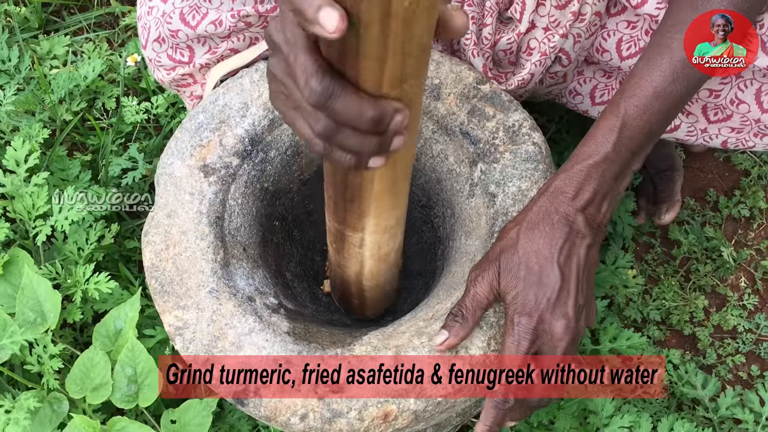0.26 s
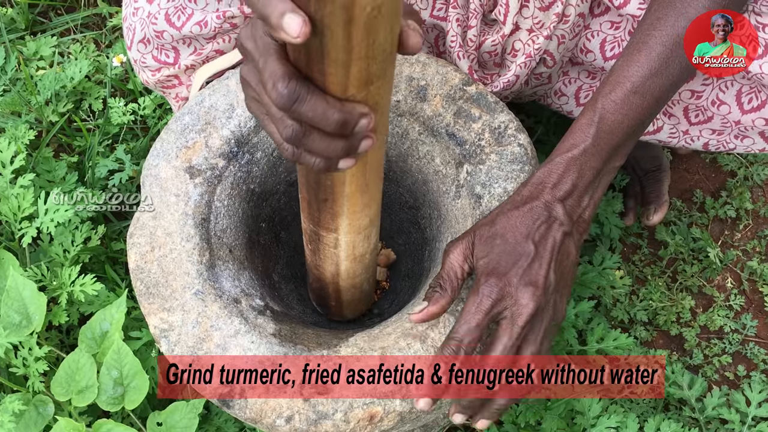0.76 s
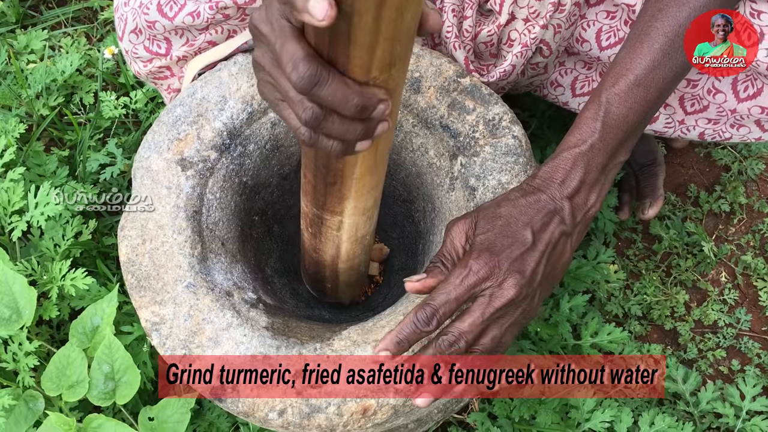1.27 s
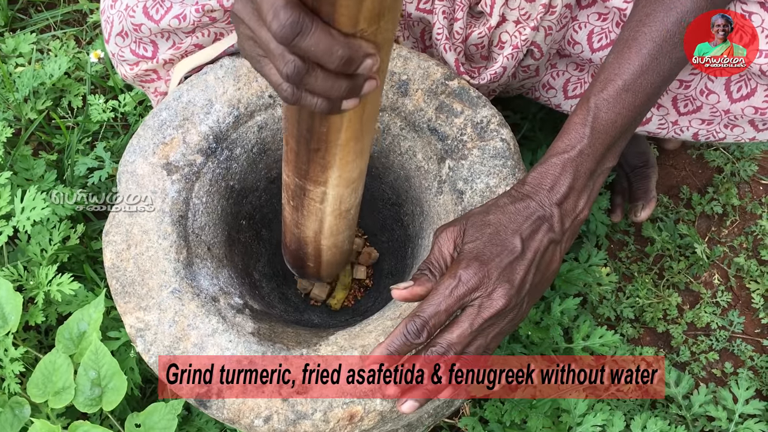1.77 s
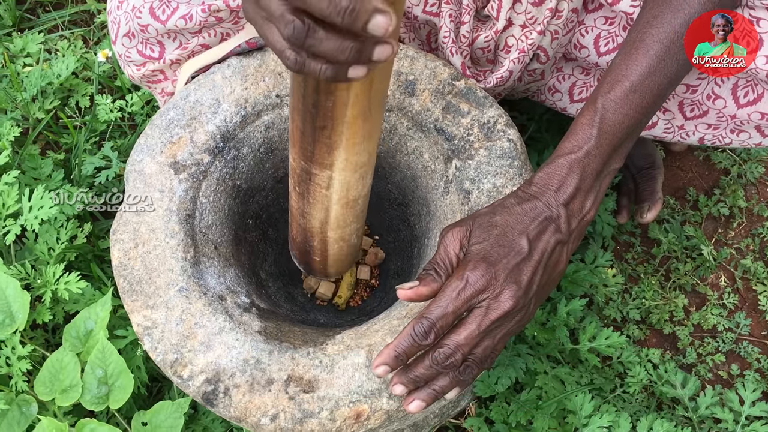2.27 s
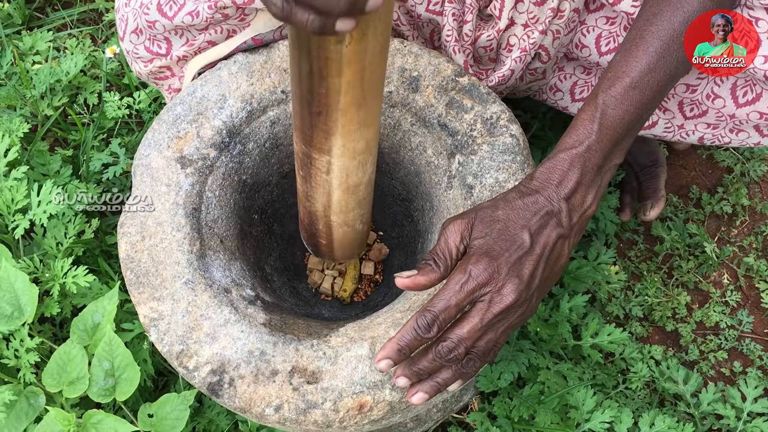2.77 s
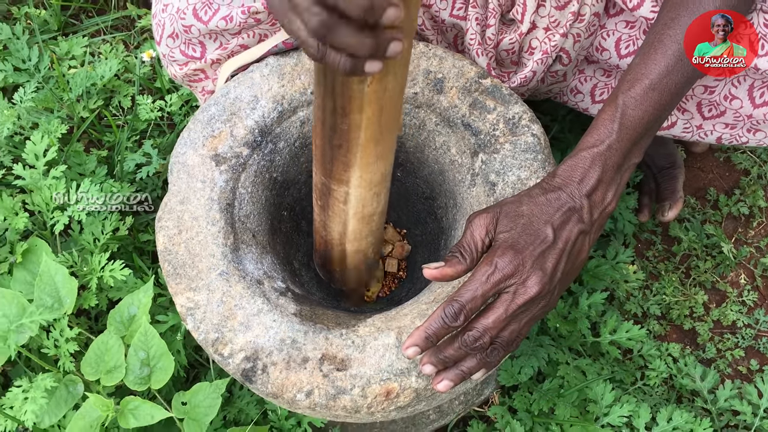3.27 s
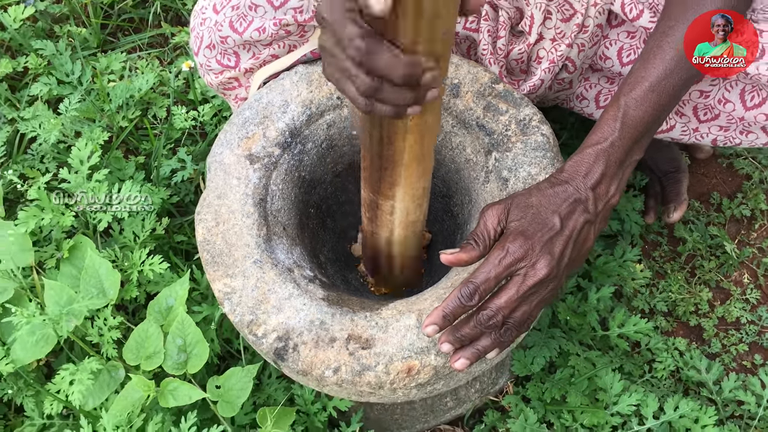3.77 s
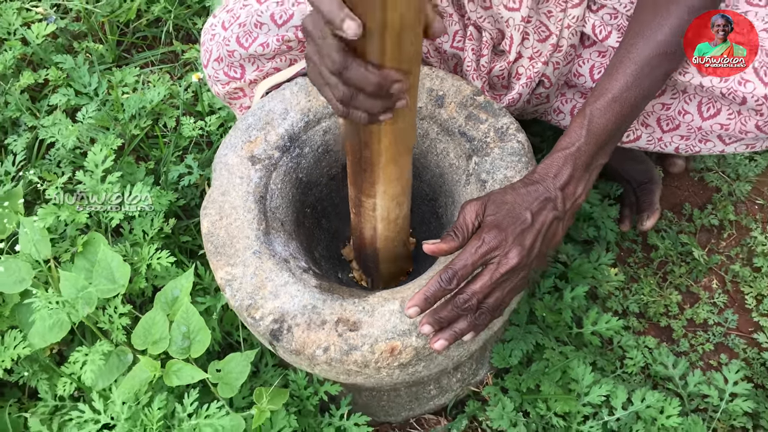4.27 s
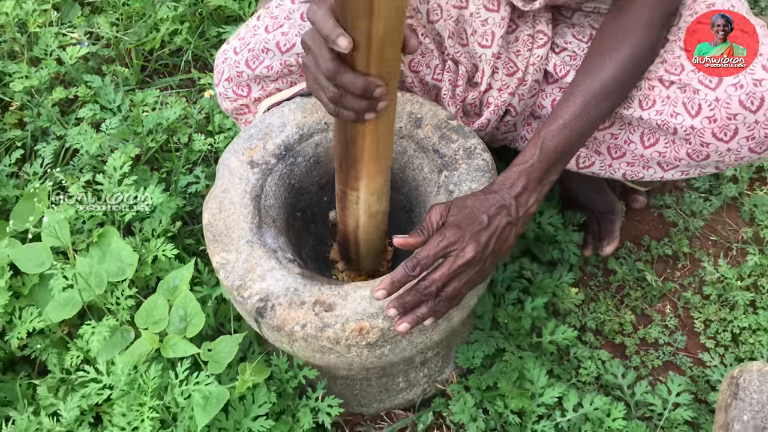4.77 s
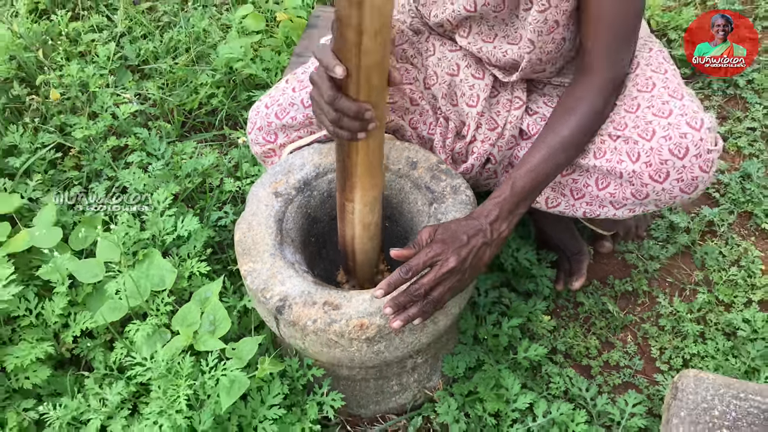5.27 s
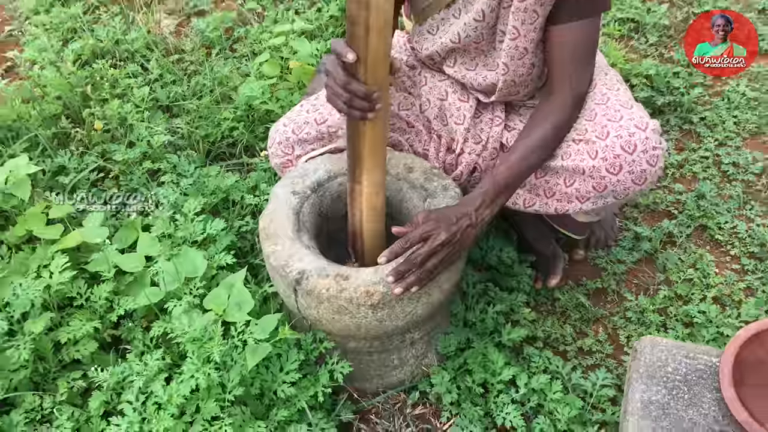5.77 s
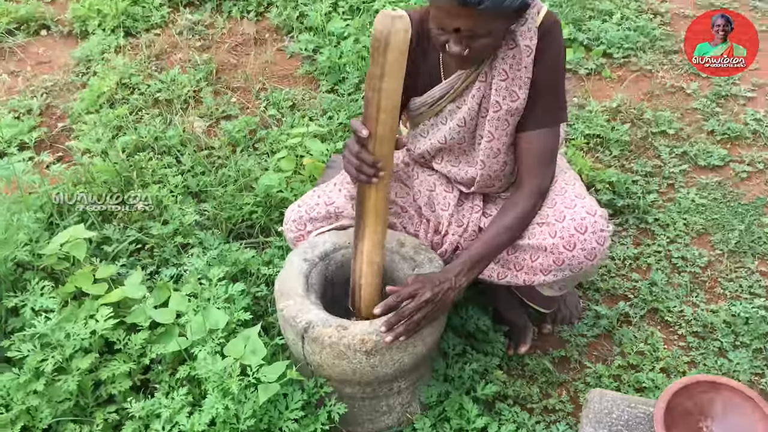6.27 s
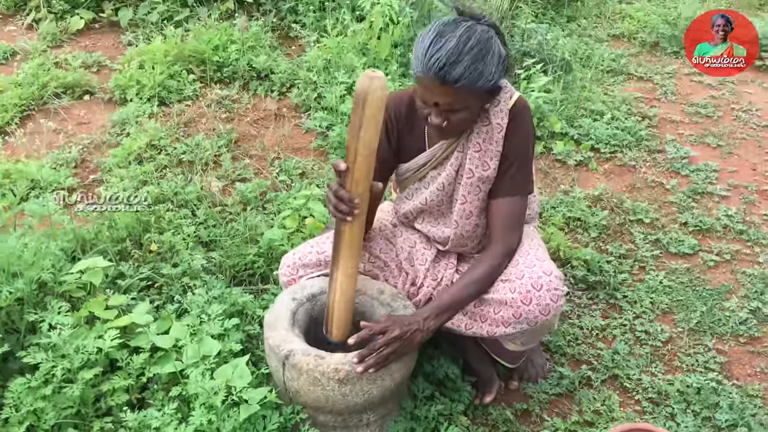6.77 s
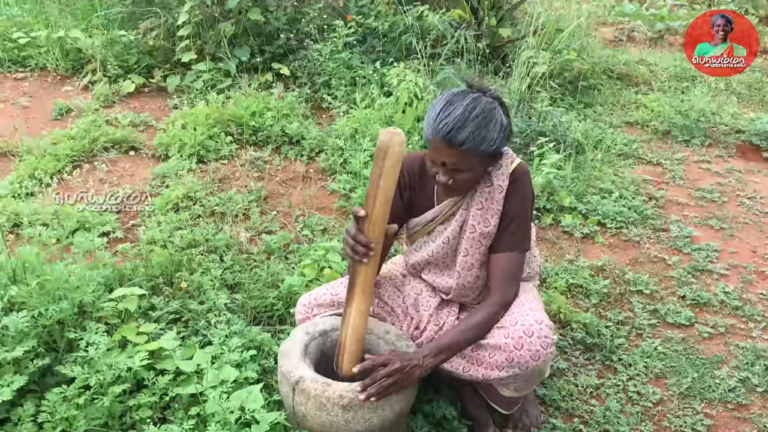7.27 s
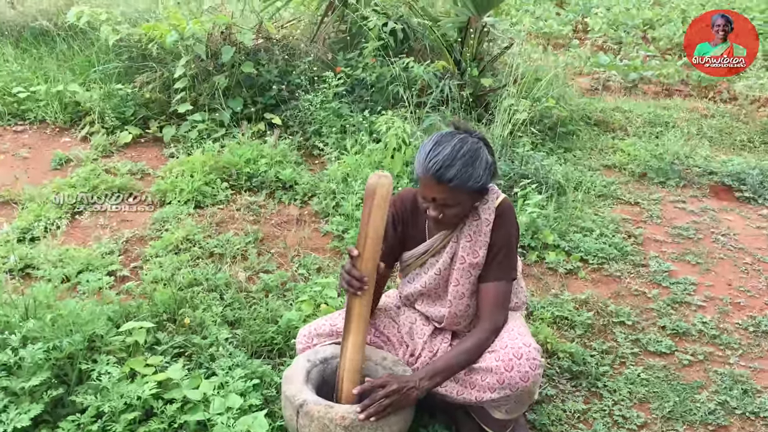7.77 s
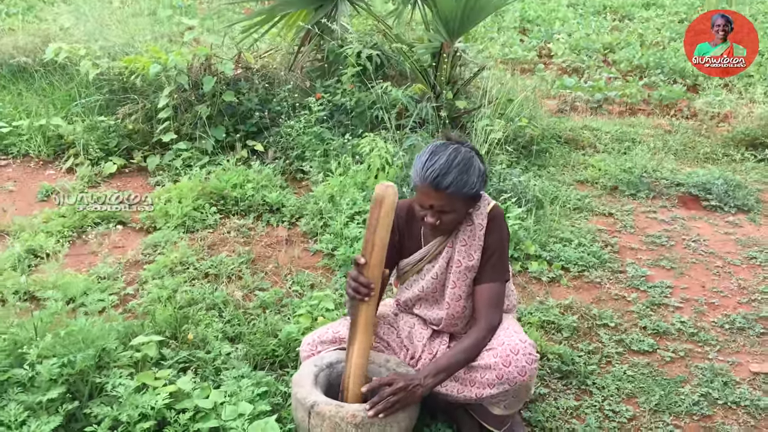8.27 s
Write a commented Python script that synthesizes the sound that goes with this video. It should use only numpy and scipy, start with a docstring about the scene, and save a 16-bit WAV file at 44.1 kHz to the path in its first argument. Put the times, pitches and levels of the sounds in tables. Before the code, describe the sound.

Regular woody knocks and gritty cracks of a pestle crushing spices in a stone mortar, growing duller, with faint birds and a low rumble.

```python
"""Sharp cracks and woody knocks over a faint hiss: a wooden pestle pounds dry spice in a stone mortar.
Each blow breaks grains, rings the bending modes of the pestle and thuds into the ground, often with
rebounds; the last blows lose their crack as the microphone backs away. Crumbs tick and grit scrapes.
In the garden around it small birds whistle, cloth and leaves rustle, bushes and walls scatter echoes,
and wind and far traffic rumble underneath."""
import sys
import numpy as np
from scipy import signal
from scipy.fft import rfft, irfft
from scipy.io import wavfile
from scipy.ndimage import uniform_filter1d

SR = 44100
rng = np.random.default_rng(int(sys.argv[2]) if len(sys.argv) > 2 else 0)


def master_out(mix):
    """Clip the mix to full scale and print it as 16-bit PCM to the path in sys.argv[1]."""
    frames = np.transpose(np.atleast_2d(mix))
    ceiling = np.clip(frames, -1, 1)
    pcm = np.round(ceiling * 32767).astype(np.int16)
    wavfile.write(sys.argv[1], SR, pcm)


N = 376173
LEAD_S = .008  # room for a hit to swell before its peak


def gain_of(db):
    """Decibels to gain."""
    return 10 ** (np.asarray(db) / 20)


def unit_rms(x):
    """Scales to rms 1."""
    return x / np.sqrt(np.mean(x ** 2) + 1e-20)


def wander(noise, samples):
    """Smooths noise into a slower random motion at rms 1."""
    return unit_rms(uniform_filter1d(noise, samples))


def automation(points):
    """Draws a line through (seconds, value) points, sample by sample."""
    return np.interp(np.arange(N) / SR, *np.transpose(points))


def eq_curve(points, hz):
    """Reads (Hz, dB) points on a log-frequency axis."""
    corner_hz, db = np.transpose(points)
    return np.interp(np.log(hz + 1), np.log(corner_hz + 1), db)


def bell(centre_hz, octaves):
    """A bell-shaped spectrum, as dB against Hz."""
    return lambda hz: np.maximum(-2.2 * (np.log2((hz + 50) / centre_hz) / octaves) ** 2, -80)


def coloured(noise, spectrum_db):
    """Gives noise the spectrum returned by a function of Hz, at rms 1."""
    hz = np.fft.rfftfreq(len(noise), 1 / SR)
    return unit_rms(irfft(rfft(noise) * gain_of(spectrum_db(hz)), len(noise)))


def low_pass(x, hz):
    """Steep treble cut."""
    return signal.oaconvolve(x, signal.firwin(301, hz, window=("kaiser", 9), fs=SR), "same")


def add(mix, start_s, sound):
    """Mixes a sound in at its start time."""
    part = mix[round(start_s * SR):][:len(sound)]
    part += sound[:len(part)]


def burst(t, rise_ms, fall_ms):
    """Envelope with its peak of 1 at t = 0: steep swell before, exponential fall after."""
    ms = np.abs(t) * 1000
    return np.where(t < 0, np.exp(-(ms / rise_ms) ** 1.5), np.exp(-ms / fall_ms))


def wash(spectrum, size, bins, level_db, patchy_db, flicker_db, tilt_db=np.zeros(N)):
    """A noise bed from random short-time spectra: patches drift, the level flickers; tilt is per octave."""
    hop = size // 4
    frames, hz = N // hop + 5, np.fft.rfftfreq(size, 1 / SR)[:bins]
    real, imag, patches = rng.standard_normal((frames, bins, 3)).T
    patches = unit_rms(uniform_filter1d(uniform_filter1d(patches, 10, axis=0), 12, axis=1))
    flicker = wander(rng.standard_normal(frames), 3)
    frame_starts = np.minimum(np.arange(frames) * hop, N - 1)
    slope_db = np.log2(hz / 6000 + .05)[:, None] * tilt_db[frame_starts]
    field_db = eq_curve(spectrum, hz)[:, None] + slope_db + patchy_db * patches + flicker_db * flicker
    spectra = np.pad((real + 1j * imag) * gain_of(field_db), ((0, size // 2 + 1 - bins), (0, 0)))
    noise = signal.istft(spectra, nperseg=size, noverlap=size - hop)[1][:N]
    return gain_of(level_db) * unit_rms(noise)


def tone(times, hz, db, noise, waver, waver_samples, overtones_db=()):
    """A sine with optional overtones that follows a pitch and level path, wavering in both."""
    t = np.arange(times[0], times[-1], 1 / SR)
    drift, flutter = (wander(row, waver_samples)[:len(t)] for row in noise)
    phase = 2 * np.pi * np.cumsum(np.interp(t, times, hz) * (1 + waver * drift)) / SR
    wave = np.sin(phase) + sum(gain_of(o) * np.sin(k * phase) for k, o in enumerate(overtones_db, 2))
    envelope = gain_of(np.interp(t, times, db) + 1.2 * flutter) * signal.windows.tukey(len(t), .2)
    return np.sqrt(2) * envelope * wave


# Tone colour of the deep and upper rumble. Each row: frequency in Hz, relative level in dB.
DEEP_EQ = [(18, -44), (30, -12), (43, -1.5), (65, -2.5), (97, -6), (120, -7), (160, -31), (260, -120)]
UPPER_EQ = [(41, -33.5), (70, -3.5), (118, -1), (177, -15), (210, -11.5), (269, -23), (306, -16.5),
            (351, -25), (575, -26), (900, -37.5), (1170, -59), (1980, -120)]
# Fader ride of the deep rumble. Each row: time in seconds, level in dB.
DEEP_RIDE = [(0.0, -60), (0.71, -57.5), (2.2, -60.5), (3.7, -58.5), (4.47, -56), (5.5, -56), (5.9, -57.5),
             (6.72, -60.5), (7.2, -63), (8.53, -62)]


def rumble():
    """Wind and far traffic: a slowly swelling deep bed under a steadier upper one."""
    deep = wash(DEEP_EQ, size=4096, bins=26, level_db=automation(DEEP_RIDE), patchy_db=1.2, flicker_db=.9)
    upper = wash(UPPER_EQ, size=2048, bins=94, level_db=-60.5, patchy_db=1.05, flicker_db=.94)
    return deep + upper


# One path for each engine. Each row: time in seconds, pitch in Hz, level in dB.
ENGINE_PATHS = [
    [(0, 110, -62.5), (1.0, 111, -63), (2.0, 111, -65), (2.4, 112, -56.5), (2.7, 111, -61.5),
     (3.8, 111, -60), (4.4, 111.5, -61), (4.75, 111.5, -65)],
    [(0, 134, -71.5), (1.5, 134, -68), (3.2, 134, -68), (4.3, 134, -72)],
    [(3.7, 41.5, -69), (3.85, 44.7, -59), (4.2, 54.5, -58.5), (4.64, 73.7, -55.5), (4.9, 84, -65.5)],
    [(4.6, 38, -64), (4.87, 43.4, -55.5), (5.58, 55.6, -55), (5.84, 54.6, -58), (6.67, 44.7, -58.5),
     (6.92, 43.8, -57), (7.3, 42.5, -62)],
]


def engines():
    """Far engines drone and glide."""
    out = np.zeros(N)
    for path in ENGINE_PATHS:
        times, hz, db = np.transpose(path)
        noise = rng.standard_normal((2, 5 * SR))
        add(out, times[0], tone(times, hz, db, noise, waver=.02, waver_samples=4000))
    return out


# Tone colour of the rustle. Each row: frequency in Hz, relative level in dB.
RUSTLE_EQ = [(180, -33.5), (300, -2), (532, -10.5), (662, -9.5), (1100, -9), (1670, -6), (1980, -13.5),
             (2190, -8.5), (15200, -13.5), (16000, -10), (16800, -51)]
# Fader ride of the rustle. Each row: time in seconds, level in dB.
RUSTLE_RIDE = [(0.0, -71), (0.22, -75.5), (0.39, -72), (0.53, -64.5), (0.79, -66), (1.01, -77.5),
               (1.27, -72), (1.39, -66), (3.15, -65), (3.5, -67), (4.18, -64), (4.3, -59), (4.6, -64),
               (6.49, -65), (6.96, -71), (7.3, -68.5), (7.75, -72), (8.53, -71)]


def rustle():
    """Cloth and leaves make a thin hiss that brightens as it gets louder."""
    level_db = automation(RUSTLE_RIDE)
    tilt_db = .15 * (level_db + 66)  # neutral at -66 dB
    return wash(RUSTLE_EQ, size=256, bins=129, level_db=level_db,
                patchy_db=.7, flicker_db=1.03, tilt_db=tilt_db)


def garden_echoes(x, t60, predelay_s, clump_db):
    """Bushes and walls scatter sound back as sparse, decaying echoes that come in clumps."""
    t = np.arange(SR // 2) / SR
    clumps_db = clump_db * wander(rng.standard_normal(len(t)), 700)
    taps = rng.choice([-1., 1.], len(t)) * (rng.random(len(t)) < 2000 / SR)
    taps *= gain_of(clumps_db - 60 * t / t60) * (t > predelay_s)
    return signal.fftconvolve(x, taps / np.linalg.norm(taps))[:N]


# Bird calls. Each row: start in seconds, length in seconds, first, middle and last pitch in Hz,
# level in dB, second harmonic in dB relative to the fundamental.
BIRD_CALLS = [(0.0, .025, 3218, 3200, 3150, -66, -14), (0.1, .095, 3139, 3186, 3150, -62, -20.5),
              (0.21, .05, 3150, 3150, 3150, -74, -18), (0.272, .052, 3150, 3150, 3100, -65, -15),
              (0.34, .055, 3168, 3140, 3200, -78, -18), (0.47, .1, 3110, 3180, 3190, -68, -18),
              (.58, .06, 2080, 2067, 2064, -70, -18), (0.67, .09, 3150, 3100, 2950, -70, -18),
              (0.93, .12, 2900, 2980, 2930, -76, -18), (0.99, .07, 5050, 4900, 4480, -80, -12),
              (1.11, .05, 4950, 4900, 4590, -82, -12), (1.36, .12, 4630, 4970, 4600, -78, -12),
              (1.54, .03, 5120, 5114, 5140, -74, -12), (1.59, .04, 5033, 4850, 4460, -78, -12),
              (1.91, .12, 4480, 5080, 5100, -73, -12), (2.12, .05, 5220, 5160, 5150, -73, -12),
              (4.13, .05, 5060, 5102, 5146, -73, -12), (4.49, .09, 4916, 4980, 4650, -76, -12),
              (4.8, .14, 4850, 5090, 4880, -71, -12), (5.0, .09, 5210, 5200, 5050, -68, -12),
              (5.16, .045, 5086, 5050, 4996, -70, -12), (5.6, .085, 3414, 3900, 4650, -70, -18),
              (5.78, .12, 5160, 5120, 4614, -70, -12), (5.95, .1, 5040, 4880, 4494, -72, -12),
              (6.28, .1, 5250, 5100, 4900, -78, -12), (7.14, .09, 5169, 5050, 4600, -69, -12),
              (7.27, .08, 6219, 6090, 6100, -71, -22), (7.38, .08, 3430, 3450, 3488, -74, -18),
              (7.5, .08, 3420, 3500, 3420, -74, -18), (7.63, .09, 4976, 4950, 4730, -62, -10.5),
              (7.75, .11, 6138, 6030, 5750, -60, -22), (7.89, .07, 3638, 3630, 3650, -74, -18),
              (7.92, .12, 4000, 4000, 4000, -72, -18), (7.96, .08, 5750, 6100, 6250, -58.5, -22),
              (7.99, .05, 4719, 4700, 4580, -63, -10.5), (8.08, .1, 5200, 5050, 4670, -57.5, -10.5),
              (8.25, .09, 4914, 4850, 4741, -61, -10.5), (8.35, .08, 5110, 4980, 4780, -58.5, -10.5)]


def birds():
    """Small birds whistle: each call bends along a parabola and is softer at its ends."""
    out = np.zeros(N)
    along = np.linspace(-1, 1, 17)  # from the start of a call to its end
    ends_db = along ** 2 * np.where(along < 0, -5, -7)
    for start, length, first_hz, middle_hz, last_hz, db, second_db in BIRD_CALLS:
        glide = along * (last_hz - first_hz) / 2
        arch = along ** 2 * ((first_hz + last_hz) / 2 - middle_hz)
        noise = rng.standard_normal((2, 8192))
        call = tone(length * (along + 1) / 2, middle_hz + glide + arch, db + ends_db, noise,
                    waver=.011, waver_samples=120, overtones_db=[second_db, second_db - 8])
        add(out, start, call)
    return out


# Drags of the pestle. Each row: start in seconds, end in seconds, level in dB, band centre in Hz.
DRAGS = [(0.022, 0.15, -59.5, 13000), (0.402, 0.445, -41, 3500), (0.826, 0.86, -40, 4000),
         (0.457, 0.553, -60.5, 4000), (0.861, 0.967, -57.5, 3940), (2.297, 2.44, -70.5, 5000),
         (2.737, 2.86, -60, 10000), (4.112, 4.14, -62.5, 4000), (4.169, 4.294, -58, 2710),
         (4.327, 4.46, -58.5, 7000), (4.606, 4.643, -53, 7000), (5.048, 5.12, -64, 5000),
         (6.0, 6.049, -67, 3500), (6.63, 6.73, -61, 4500), (7.42, 7.518, -68, 10000),
         (8.44, 8.5, -60, 2300)]


def scrapes():
    """The pestle drags through grit: grainy noise that swells and fades."""
    out = np.zeros(N)
    for start, end, db, centre_hz in DRAGS:
        noise, roughness = rng.standard_normal((2, 8192))
        grains = unit_rms(coloured(noise, bell(centre_hz, octaves=1.05)) * gain_of(3 * wander(roughness, 70)))
        length = min(round((end - start) * SR), len(noise))
        add(out, start, gain_of(db) * grains[:length] * signal.windows.tukey(length, .6))
    return out


# Crumb ticks. Each row: peak time in seconds, relative level in dB, band centre in Hz.
CRUMB_TICKS = [(0.204, -60, 13000), (0.2672, -63, 7200), (0.335, -59, 12000), (0.8743, -42, 5600),
               (1.2233, -52, 6900), (1.313, -42, 5930), (1.389, -53, 3100), (1.7007, -42, 11100),
               (2.2553, -49, 11400), (3.0118, -45, 3500), (3.0297, -34.5, 8560), (3.0586, -55, 2000),
               (3.1126, -47, 5400), (3.17, -35.5, 6500), (3.2041, -50, 12000), (3.2368, -46.5, 3300),
               (3.3033, -48, 12600), (4.211, -43, 2860), (4.2838, -46, 4400), (4.2986, -46, 2700),
               (4.6517, -43, 3260), (4.6715, -51, 4100), (4.6979, -49, 5970), (4.9426, -49, 5200),
               (4.977, -46, 14100), (5.0857, -50, 5560), (6.0225, -55, 3110), (6.7587, -57, 6500),
               (6.7782, -59, 4800), (6.8029, -53, 4700), (7.0274, -57, 4800), (6.864, -52, 5000),
               (6.8986, -55, 3700), (6.9532, -47, 7100), (6.989, -53, 4100), (7.299, -49, 2600),
               (7.3329, -57, 3600), (8.1316, -45, 2590), (8.1962, -43, 3300), (8.248, -54.5, 3116),
               (8.3375, -55, 4200), (8.4295, -56.5, 3570)]


def crumbs():
    """A crumb drops or snaps: a short noisy click around its own pitch, with a faint tail."""
    out = np.zeros(N)
    t = np.arange(1024) / SR - LEAD_S
    envelope = burst(t, rise_ms=.74, fall_ms=1) + .12 * burst(t, rise_ms=.6, fall_ms=4)
    for peak_s, db, centre_hz in CRUMB_TICKS:
        grit = coloured(rng.standard_normal(len(t)), bell(centre_hz, octaves=.58))
        add(out, peak_s - LEAD_S, .8 * gain_of(db) * grit * envelope)
    return out


# Tone colour of breaking spice. Each row: frequency in Hz, relative level in dB.
CRACK_EQ = [(240, -31.5), (400, -5), (1120, -12.5), (1710, -8.5), (4660, -5.5), (5530, -3), (7330, -6),
            (13900, -5), (16800, -16.5)]


def spice_crack(t, noise, lumps, rise_ms, fall_ms, crunch_db):
    """Grains break in one bright crack; a lumpy crunch follows and finer grit trails after it."""
    grit = coloured(noise, lambda hz: eq_curve(CRACK_EQ, hz) + .3 * np.log2(hz / 6000 + .043))
    tail = burst(t, rise_ms, fall_ms=10.2) + gain_of(-22) * burst(t, rise_ms, fall_ms=24)
    return grit * (burst(t, rise_ms, fall_ms) + gain_of(crunch_db) * lumps * tail)


# Modes of pestle and mortar, deepest first. Each row: group (0-5: thud, low, knock, main, upper, top),
# pitch in Hz, relative level in dB, base time to fade by 60 dB in seconds.
MODES = [(0, 125, -7, .077), (0, 177.9, 1.5, 0.065), (0, 230, -7, 0.051), (0, 355, -3, .044),
         (0, 514.5, -3, 0.05), (1, 661, 0, 0.074), (2, 1060, 1.5, .02), (2, 1280, -2.5, 0.03),
         (3, 1671, 1, 0.063), (4, 2892, 0, .038), (5, 4064, 1, .026), (5, 4404, -6.5, .028)]


def body_ring(age, group_db, ground_db, ring_factor):
    """Struck pestle and mortar ring as damped sines, slightly detuned on every hit."""
    swell = 1 - np.exp(-age / .0015)  # the force lasts a millisecond or two
    ring = np.zeros(len(age))
    for index, (group, hz, db, t60) in enumerate(MODES):
        phase, detune = rng.standard_normal(2)
        level_db = group_db[int(group)] + db + (ground_db if index == 0 else 0)
        decay = gain_of(level_db - 60 * age / (ring_factor * t60))
        ring += decay * np.sin(2 * np.pi * hz * (1 + .004 * detune) * age + .72 * phase)
    return swell * ring


# How the hits change as the pounding goes on. Each row: time in seconds, dB added to the deepest mode,
# ring length as a factor set by grip and spice, crunch in dB relative to the crack.
HIT_CHARACTER = [(0.4, -5, 1.05, -20.5), (0.85, -8, 1.5, -21), (1.25, -6, .9, -22.5), (1.65, -8, 1.4, -23),
                 (2.06, -9, 1.05, -22.5), (2.5, -8, 1.25, -22), (3.9, -6, 1.05, -24), (4.3, -3, .75, -24),
                 (4.75, -2, 1.1, -22.5), (5.7, -2, .75, -21.5), (6.1, -1.5, .85, -20.5), (6.6, -2, .8, -18),
                 (7.1, -.6, 1.05, -16), (8.5, 4, .95, -16)]


def contact(peak_s, crack_db, rise_ms, fall_ms, *group_db):
    """One short force cracks the spice and strikes the modes; the settling pestle keeps exciting them."""
    times, *columns = np.transpose(HIT_CHARACTER)
    ground_db, ring_factor, crunch_db = (np.interp(peak_s, times, column) for column in columns)
    crack_noise, lump_noise, rattle_noise = rng.standard_normal((3, 6144))
    t = np.arange(len(crack_noise)) / SR - LEAD_S
    lumps = gain_of(3.4 * wander(lump_noise, 30))  # grains give way unevenly
    crack = .79 * gain_of(crack_db) * spice_crack(t, crack_noise, lumps, rise_ms, fall_ms, crunch_db)
    age = np.maximum(t + min(rise_ms, 1.5) / 1000, 0)  # the ring starts just before the crack peaks
    ring = 1.313 * body_ring(age, group_db, ground_db, ring_factor)
    rattle = gain_of(-43) * rattle_noise * lumps * burst(t + LEAD_S, rise_ms, fall_ms=8)
    return crack + ring + signal.fftconvolve(ring, rattle)[:len(t)]


# Hard hits of wood on spice and stone. Each row: peak time in seconds, relative crack level in dB,
# rise in ms, fall in ms, then the gains of the thud, low, knock, main, upper and top modes in dB.
HARD_HITS = [(0.4234, -20.5, 0.53, 0.5, -55, -52, -45, -34, -35, -34),
             (0.4447, -23, 0.64, 0.5, -65, -45, -41, -28, -46, -44),
             (0.447, -23.5, 0.52, 0.6, -69, -56, -60, -30, -58, -47),
             (0.8412, -21.5, 2.1, 0.9, -48, -32.5, -43, -25.5, -44, -45),
             (1.2465, -8.5, 1.7, 0.7, -30.5, -34.5, -33, -24, -34, -24),
             (1.645, -9, 1.25, 0.6, -39, -46.5, -41, -38, -38, -25.5),
             (2.0586, -23, 0.49, 2.1, -27, -28, -23.5, -19.5, -24, -23.5),
             (2.0615, -9.5, 1.47, 0.6, -27.5, -30, -28, -19, -27, -28),
             (2.4829, -9, 1.1, 0.7, -24.5, -24.5, -42, -31.5, -22, -18),
             (2.9504, -9, 0.54, 1.1, -51, -35.5, -38.5, -24.5, -28, -25),
             (2.9648, -18, 0.78, 2.1, -40, -30.5, -28, -17, -18.5, -24),
             (2.9669, -12, 0.68, 0.9, -27, -27.5, -30, -17, -30, -23),
             (2.9696, -14, 4.1, 1.6, -27.5, -27.5, -49.5, -27.5, -39, -23),
             (3.4318, -22, 1.45, 4.1, -29, -20.5, -14, -33, -22, -28),
             (3.4352, -21, 0.46, 0.6, -29.5, -16.5, -13, -33.5, -23.5, -48),
             (3.8831, -12, 1.48, 2.1, -34, -29, -25, -20.5, -23.5, -27),
             (3.886, -14, 0.61, 0.3, -37, -42, -50, -25.5, -32, -31),
             (4.3135, -10.5, 0.95, 1.4, -26.5, -36, -31, -23.5, -23.5, -24.5),
             (4.7549, -9, 1.7, 0.55, -24.5, -22, -30, -18.5, -31, -32.5),
             (5.213, -8.5, 1.45, 0.6, -28.5, -36.5, -30, -19, -29, -23.5),
             (5.6864, -12, 0.62, 1.1, -23.5, -32, -23, -14.5, -29.5, -26.5),
             (6.1344, -13, 0.55, 1.4, -27, -31, -28, -14.5, -16, -20.5),
             (6.6045, -15.5, 1.2, 1.7, -22.5, -24, -32, -20.5, -17.5, -29.5),
             (7.1015, -25, 1.41, 1.7, -22.5, -21.5, -33, -25.5, -36.5, -42),
             (7.5937, -30, 1.28, 2.7, -27, -28.5, -42, -22, -28.5, -47),
             (8.0467, -30.5, 1.66, 2.4, -34, -41.5, -44, -29, -35.5, -36.5),
             (8.4942, -39, 0.85, 2.6, -61, -44, -40, -30, -36, -49.5),
             (8.5069, -35.5, 1.6, 3.3, -41.5, -36, -36, -33.5, -36.5, -41)]
# Light touches. Each row: peak time in seconds, then relative crack, thud and ring levels in dB.
LIGHT_TOUCHES = [(0.4005, -44, -65, -52), (0.41, -33, -49, -45), (0.506, -62, -70, -46),
                 (0.87, -50, -65, -41), (0.897, -40, -65, -50), (0.936, -50, -70, -50),
                 (2.548, -50, -65, -47), (7.166, -58, -50, -50), (0.4169, -28, -51, -44),
                 (0.438, -36, -59, -33), (0.8257, -43, -63, -44), (0.8352, -30, -48, -37),
                 (0.8525, -24, -48, -36), (1.2394, -33.5, -41.5, -36), (1.2658, -29, -59, -45),
                 (1.6685, -37.5, -47.5, -43), (2.078, -29, -52, -39), (2.5039, -15, -41, -33),
                 (3.4537, -20.5, -57, -36), (3.9071, -43.5, -57, -58), (4.3284, -40, -59, -48),
                 (4.769, -27, -44.5, -40), (4.7767, -33, -39, -48), (5.2234, -31, -51, -40),
                 (5.237, -36.5, -46, -52), (5.6953, -32.5, -39, -36), (5.708, -39, -55, -45),
                 (6.1422, -31.5, -42, -37), (6.1578, -40, -57, -45), (6.6119, -30, -38, -36),
                 (6.6271, -40, -34, -48), (7.1082, -38.5, -31, -33), (7.1236, -45, -34.5, -39),
                 (7.6163, -44, -34, -55), (8.0535, -39, -43, -46)]
# Trims on a light touch's ring, in dB, for the low, knock, main, upper and top modes.
TOUCH_TRIMS_DB = [-12, -16, -1.5, -13, -13]


def pestle():
    """The pestle lands hard, and touches lightly as it sinks through the spice or rebounds."""
    out = np.zeros(N)
    rise_ms, fall_ms = 1.6, 1.4  # for the light touches
    touches = [(peak_s, crack_db, rise_ms, fall_ms, thud_db, *(ring_db + np.array(TOUCH_TRIMS_DB)))
               for peak_s, crack_db, thud_db, ring_db in LIGHT_TOUCHES]
    for peak_s, *settings in HARD_HITS + touches:
        add(out, peak_s - LEAD_S, contact(peak_s, *settings))
    return out


def scene():
    """Mortar, birds and their echoes over rustle, scrapes, rumble and engines, in mono."""
    mortar, song = pestle() + crumbs(), birds()
    # far surfaces return mostly the mids
    mids = signal.lfilter(*signal.butter(2, [1100, 2600], "band", fs=SR), mortar)
    echoes = gain_of(-38.5) * garden_echoes(mids, t60=.9, predelay_s=.036, clump_db=3.5)
    echoes += gain_of(-7) * garden_echoes(song, t60=.3, predelay_s=.013, clump_db=3)
    friction = low_pass(rustle() + scrapes(), hz=15900)
    return (mortar + song + echoes + friction + rumble() + engines())[None]


def record(dry):
    """The microphone cuts the deepest bass, and the recorder shaves off the highest treble."""
    thinned = signal.sosfilt(signal.butter(4, 36, "high", fs=SR, output="sos"), dry[0])
    return low_pass(thinned, hz=16830)[None]


dry = scene()
out = record(dry)
master_out(out)
```